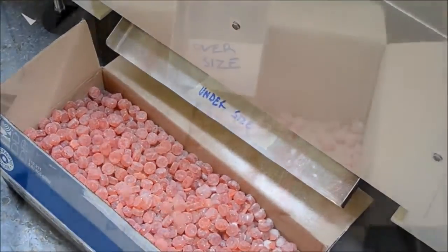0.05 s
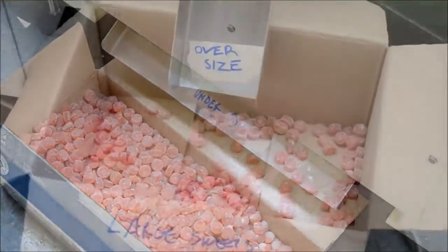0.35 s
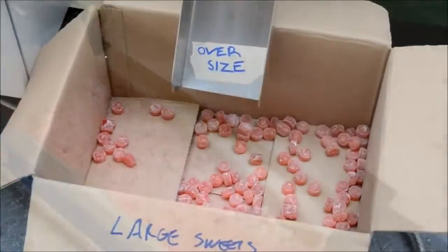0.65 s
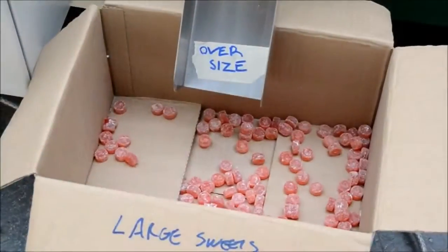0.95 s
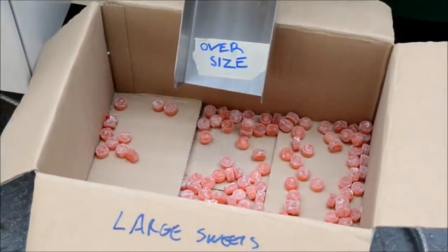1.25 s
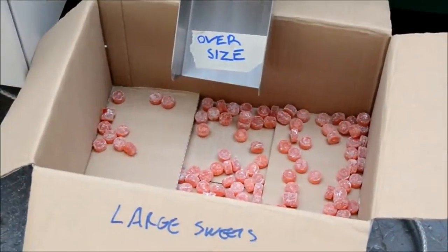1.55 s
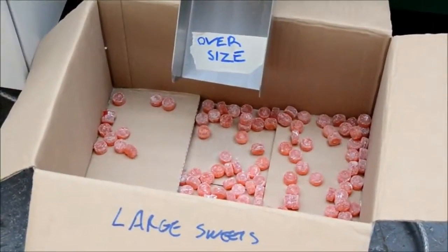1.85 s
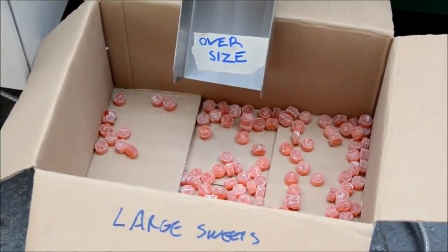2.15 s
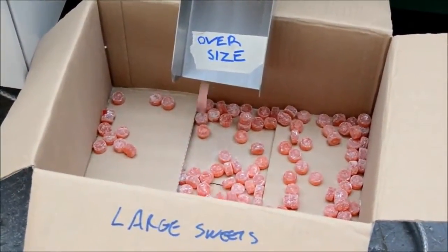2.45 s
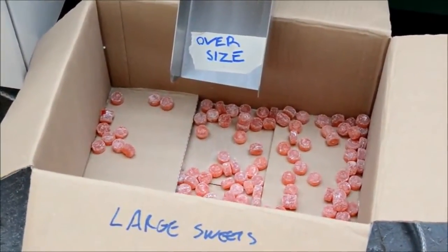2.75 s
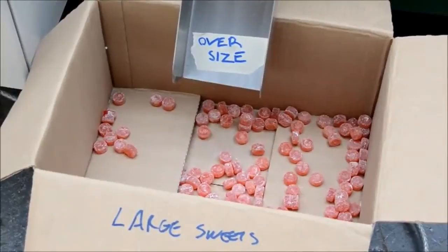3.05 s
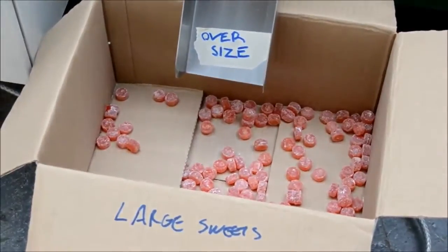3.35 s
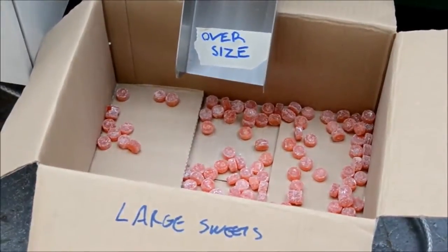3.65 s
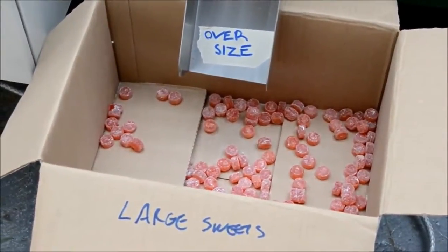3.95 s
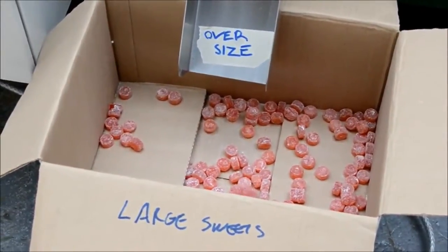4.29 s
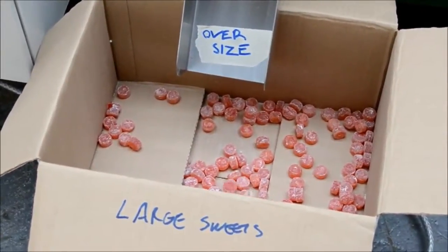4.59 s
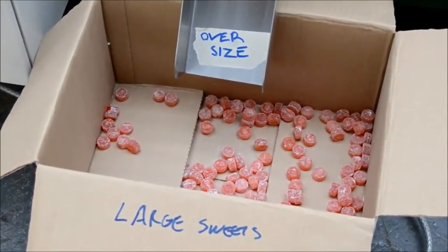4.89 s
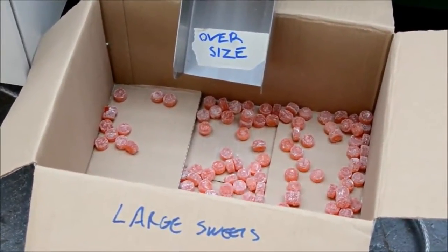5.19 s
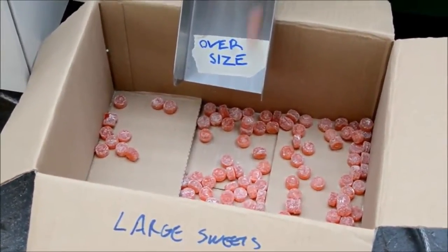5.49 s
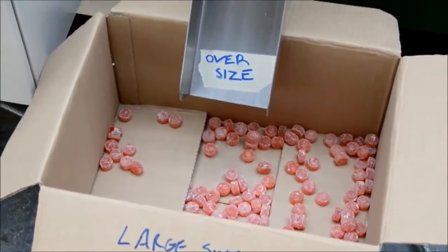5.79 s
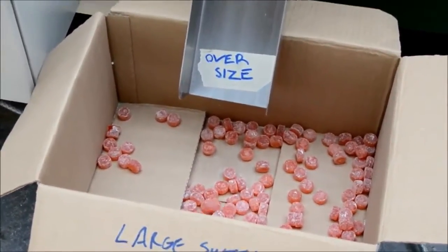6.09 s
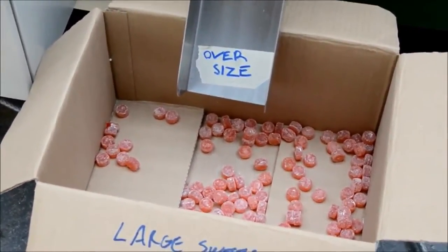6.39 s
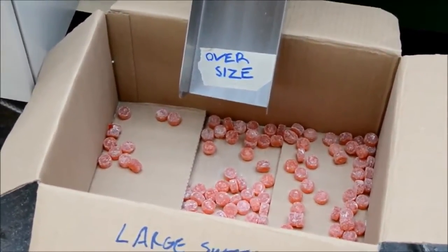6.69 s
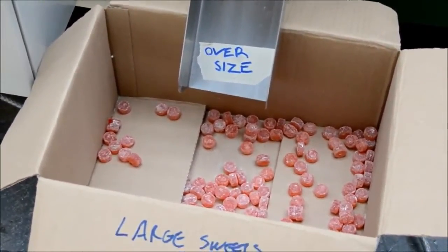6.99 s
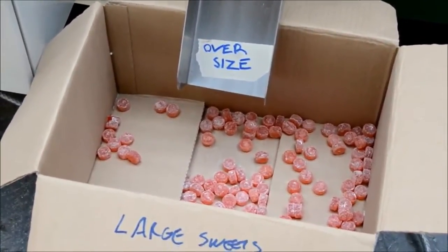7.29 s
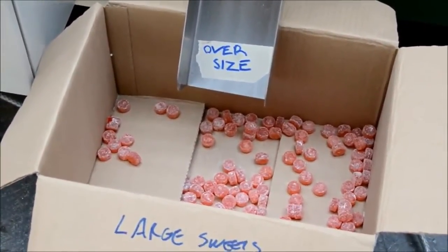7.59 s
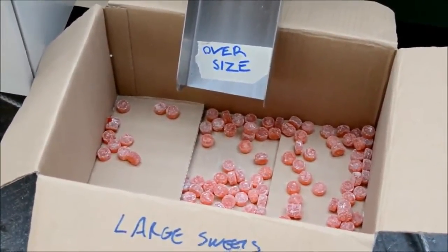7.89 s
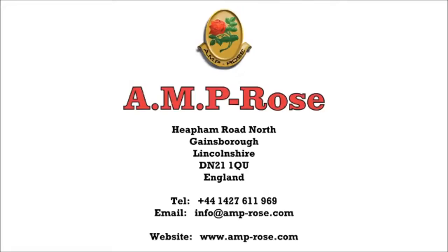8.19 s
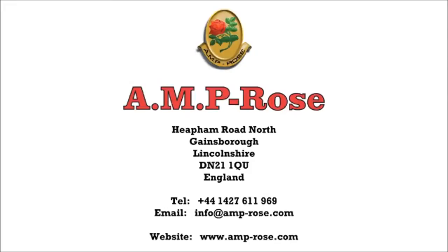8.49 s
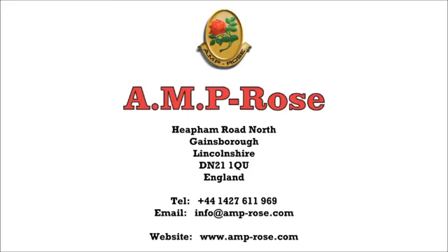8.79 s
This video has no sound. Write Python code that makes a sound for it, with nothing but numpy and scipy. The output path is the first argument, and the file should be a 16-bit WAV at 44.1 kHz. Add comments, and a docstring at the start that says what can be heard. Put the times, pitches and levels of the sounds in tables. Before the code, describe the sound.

Heard from beside a cardboard box in a factory, a sorting machine hums under a busy patter of hard sweets ticking, chinking and pinging on steel. Now and then one knocks dully into the box. As the batch runs out, the impacts grow sparse and a thin roller whine breaks into brief squeaks. The machine starts to rattle just before an abrupt stop.

```python
"""A sweet sorting machine in a factory, heard from beside a cardboard box under its chute.
From the start, hard sweets tumble over steel rollers and strike trays, exciting their ringing modes,
while the drive drones. Soon friction sets a roller singing, and a few sweets thud into the box.
As the batch ends the impacts thin out and the roller binds in short squeals.
Last, the frame begins to rattle, and the sound is cut short."""
import sys
import numpy as np
from scipy import signal
from scipy.fft import rfft, irfft
from scipy.io import wavfile
from scipy.ndimage import uniform_filter1d

SR = 44100
rng = np.random.default_rng(int(sys.argv[2]) if len(sys.argv) > 2 else 0)


def digitize_waveform(pressure):
    """Quantize a signal to 16-bit integers and store it at the path in sys.argv[1].

    Rows of a 2-D input are taken as channels; values are limited to [-1, 1].
    """
    field = np.atleast_2d(pressure).T
    bounded = np.clip(field, -1, 1)
    quanta = np.round(bounded * 32767).astype(np.int16)
    wavfile.write(sys.argv[1], SR, quanta)


N = 394254
STOP_S = 8.243

# Normal modes of the steel trays. Each row: frequency in Hz, relative level in dB.
TRAY_MODES = [(1528, -4), (1718, 2.5), (1905, -4), (2024, -3), (2110, -8), (2271, -2), (2400, -9),
              (2476, -3), (2573, -7), (2720, -9), (2788, -3), (2842, -5), (3050, -10), (3251, -5),
              (3348, -8), (3499, -6), (3983, -7), (4110, -6), (4349, -6), (4554, -6), (4715, -7),
              (5000, -8)]
# The load of sweets on the rollers. Each row: time in seconds, relative level of tumbling in dB.
SWEET_LOAD = [(0.0, -30), (0.27, -24.5), (0.73, -24.5), (0.91, -29), (1.07, -30.5), (1.27, -32.5),
              (1.42, -34), (1.65, -29.5), (1.8, -31), (1.98, -30), (2.1, -33.5), (2.4, -29.5),
              (2.64, -31.5), (2.99, -32), (3.23, -30.5), (3.45, -32.5), (3.88, -34), (4.02, -32.5),
              (4.15, -38.5), (4.92, -38.5), (5.17, -45.5), (5.41, -44.5), (5.7, -37.5), (6.17, -41),
              (6.91, -42.5), (7.4, -41.5), (8.0, -44.5)]


def tray_strikes(level_db=-5, crack_t60=.029, wash_t60=.39, ring_t60=.28, rise_s=.0062):
    """Impact excitation: a sweet cracks on steel and rebounds; dense modes wash out, a few ring on."""
    # Hard strikes. Each row: time in seconds, relative level in dB, relative treble in dB.
    hard_strikes = [(0.0064, -14.5, -13), (0.122, -20, -6), (0.1405, -18, -3.5), (0.156, -25.5, -8),
                    (0.1865, -20, 0.5), (0.2188, -22, -3.5), (0.2506, -20, -34), (0.3157, -22, -11.5),
                    (0.3331, -13.5, -14), (0.3678, -16.5, -11.5), (0.4604, -15.5, -15.5), (0.5185, -19, -3),
                    (0.5333, -18, -8), (0.548, -28, -10), (0.567, -25.5, -5), (0.5795, -19.5, -5.5),
                    (0.6297, -28.5, 3.5), (0.646, -27.5, -5), (0.6657, -21, -8.5), (0.7044, -17, -13.5),
                    (0.7688, -13.5, -12), (0.7962, -14, -17), (0.85, -19, -11), (0.951, -13.5, -17.5),
                    (1.1102, -13, -16.5), (1.122, -25, -8), (1.1528, -19, -23), (1.1851, -14.5, -14),
                    (1.209, -21, -19), (1.2512, -20, -12), (1.266, -20.5, -16.5), (1.4681, -19.5, -18),
                    (1.4887, -20, -18), (1.515, -14, -16), (1.537, -16.5, -15.5), (1.549, -20, -12),
                    (1.5674, -17, -12), (1.598, -21.5, -25), (1.694, -22, -32), (1.752, -22, -23),
                    (1.8338, -25.5, -10), (1.8766, -15, -21.5), (1.8967, -19, -12), (1.938, -14, -15.5),
                    (1.995, -17, -18), (2.1863, -17, -17.5), (2.2749, -15.5, -20), (2.3128, -16.5, -18),
                    (2.3278, -13.5, -16), (2.345, -19, -11), (2.3665, -15, -12.5), (2.467, -15.5, -12.5),
                    (2.519, -20, -16.5), (2.669, -19.5, -12), (2.6938, -16.5, -18.5), (2.7669, -12.5, -14),
                    (2.813, -17.5, -30.5), (2.8482, -14.5, -17), (2.936, -17, -12.5), (2.949, -14, -18.5),
                    (2.973, -22.5, -28), (3.052, -23, -33.5), (3.0905, -14.5, -14.5), (3.1335, -16.5, -12),
                    (3.145, -17.5, -17), (3.249, -26, -13), (3.366, -22, -14.5), (3.4048, -24, -20),
                    (3.487, -30, -18), (3.5002, -17, -14.5), (3.5562, -15.5, -18), (3.648, -22.5, -28),
                    (3.7747, -17, -10.5), (3.9178, -16.5, -24), (4.0856, -23.5, -18.5),
                    (4.2135, -27.5, -17), (4.3282, -20.5, -12), (4.3596, -20.5, -8.5), (4.384, -21, -19),
                    (4.576, -21.5, -5.5), (4.583, -17.5, -17.5), (4.598, -29, -12), (5.052, -31.5, -6.5),
                    (5.0836, -26.5, -19), (5.4658, -23, -18), (5.5946, -27.5, -13.5), (5.6482, -15.5, -8.5),
                    (5.7308, -20.5, -15.5), (7.198, -37, -6), (7.2085, -18.5, -6), (7.222, -24.5, -18),
                    (7.5527, -25.5, -17), (8.0718, -22, -15.5), (8.133, -27, -18), (8.1631, -19, -15),
                    (8.176, -20, -21), (8.216, -22, -18)]
    # Spectrum of a sweet meeting steel. Each row: frequency in Hz, gain in dB.
    contact_spectrum = [(100, -47), (500, -20.5), (1100, -0.5), (1800, -4.5), (2700, -3), (3500, -3),
                        (4800, -3), (6000, -1.5), (7800, -6), (8500, -1.5), (10000, -8.5), (11500, -30.5)]
    out, t = np.zeros(N), np.arange(SR // 4) / SR
    ring_t, clink_t = t[:SR // 7], t[:SR // 20]
    hz, mode_db = np.transpose(TRAY_MODES)
    patch_hz = np.geomspace(500, 12000, 110)
    decay = fade(ring_t, ring_t60 * (2000 / hz[:, None]) ** .5)
    # the last sweets of the batch land with little ring
    damped_db = .27 * np.minimum(curve(SWEET_LOAD) + 29.5, 0)
    # the blow takes a few milliseconds to spread through the sheet
    spread = np.sin(np.pi / 2 * np.minimum(t / rise_s, 1)) ** 2
    clink_shape = fade(clink_t, .05) * spread[:len(clink_t)]
    for s, db, bright_db in list(hard_strikes) + light_strikes():
        since_rebound = t - .015 * (.5 + rng.random())
        rebound = undb(-11) * fade(np.abs(since_rebound), crack_t60) * (since_rebound > 0)
        first_blow = fade(t, crack_t60) + undb(-17) * fade(t, wash_t60)
        contact = rng.standard_normal(len(t)) * np.hypot(first_blow, rebound)
        # an edge-on hit snaps more sharply, carries more treble and rings less
        snap_shape = fade(np.abs(t - rise_s / 2), .011) * undb(1 + .65 * bright_db)
        snap = rng.standard_normal(len(t)) * snap_shape
        contact = colour(contact * spread + snap, contact_spectrum)
        treble_db = bright_db + 9.5
        tilt_db = np.interp(patch_hz, [3800, 6500], [0, treble_db])
        ring_db = -8 + damped_db[int(s * SR)] - .2 * treble_db
        # each striking point favours its own patches of the dense modes
        patch_db = 3.8 * (np.clip(rng.standard_normal(len(patch_hz)), -2, 2) - .5)
        crack = colour(contact / strength(contact), np.column_stack([patch_hz, tilt_db + patch_db]))
        # the sweet adds a short clink of its own
        clink_hz = rng.uniform(2200, 5400, (9, 1))
        clink = np.sin(2 * np.pi * clink_hz * clink_t).sum(axis=0) * clink_shape
        detuned_hz = hz * (1 + .0025 * rng.standard_normal(len(hz)))
        weights = undb(mode_db * rng.random(len(hz))) * rng.uniform(-1, 1, len(hz))
        modes = np.sin(2 * np.pi * detuned_hz[:, None] * ring_t) * decay
        ringing = weights @ modes * spread[:len(ring_t)]
        start_s, gain = s - rise_s / 2, undb(db + level_db)
        add(out, start_s, gain * crack)
        add(out, start_s, gain * undb(-5) * clink / strength(clink))
        add(out, start_s, gain * undb(ring_db) * ringing / strength(ringing))
    return out


def light_strikes():
    """Random impacts, harder under a heavy load. Each row: time in seconds, level and treble in dB."""
    times, load_db = contact_times(count=20)
    level_scatter, treble_scatter = rng.standard_normal((len(times), 2)).T
    return list(zip(times, load_db - 2 + 1.5 * level_scatter, -14 + 3 * treble_scatter))


def tray_pings(spacing=.05, neighbour_db=-9, neighbour_t60=.099, rise_s=.0016):
    """Free vibration: a cleanly struck tray mode rings unsteadily while its neighbours clang briefly."""
    # Each row: start in seconds, frequency in Hz, level in dB, 60 dB decay time in seconds.
    struck_modes = [(.121, 2610, -24.5, .12), (.121, 3430, -30, .1), (.141, 6319, -21.5, .1),
                    (.141, 3420, -28.5, .12), (.187, 6000, -32, .1), (.219, 3190, -27.5, .14),
                    (.219, 8050, -35, .1), (.251, 4560, -21.5, .14), (.251, 3580, -29, .25),
                    (.333, 1680, -20.5, .14), (.518, 2760, -23.5, .14), (.518, 1915, -21.5, .14),
                    (.55, 1547, -27, .33), (.666, 7260, -25.5, .13), (.704, 1723, -30, 0.24),
                    (.769, 1770, -35.5, 0.21), (.952, 2764, -23.5, 0.22), (.953, 1890, -26.5, 0.25),
                    (1.087, 2450, -22, 0.14), (1.11, 1716, -31, .4), (1.484, 2320, -25, .2),
                    (1.488, 2740, -26, .2), (1.549, 1750, -37, .25), (1.561, 1098, -30, .6),
                    (1.69, 1098, -28, 0.55), (1.752, 2734, -23.5, 0.14), (1.834, 2300, -20, 0.1),
                    (1.834, 2600, -23, .1), (1.834, 3220, -22.5, 0.13), (1.834, 4170, -25, .12),
                    (1.834, 4900, -24, 0.1), (1.877, 1730, -26.5, 0.28), (1.877, 2670, -20.5, 0.1),
                    (1.974, 2770, -23.5, .17), (1.999, 3250, -35, 0.7), (2.187, 1640, -30.5, .2),
                    (2.361, 4420, -20.5, 0.14), (2.367, 1696, -25, .3), (2.467, 4800, -26, .11),
                    (2.767, 2810, -25.5, 0.237), (2.767, 6589, -33.5, .13), (2.769, 1720, -24, .35),
                    (2.813, 2500, -22, 0.15), (2.849, 1900, -27, .33), (2.849, 2860, -26, .14),
                    (2.949, 4130, -18.5, .05), (2.975, 2040, -24, 0.22), (3.09, 1710, -27, .25),
                    (3.09, 4128, -27.5, .1), (3.135, 1730, -26, 0.26), (3.135, 8500, -36, .1),
                    (3.409, 4400, -31, .12), (3.501, 8516, -35, .1), (3.557, 4000, -36, .13),
                    (3.648, 2467, -26, 0.19), (3.775, 1526, -29, .18), (3.92, 2510, -28.5, 0.3),
                    (3.92, 2840, -29, .16), (4.086, 3499, -34, .18), (5.649, 2830, -25, .12),
                    (6.21, 10340, -50, .15)]
    out, t = np.zeros(N), np.arange(SR // 2) / SR
    clang_t = t[:SR // 8]
    unsteady = 1 + .16 * (walk(110) + 1j * walk(110))  # in amplitude and phase
    for s, hz, db, t60 in struck_modes:
        note = np.imag(np.exp(2j * np.pi * hz * t) * unsteady[int(s * SR):][:len(t)]) * fade(t, t60)
        near_hz = hz * (1 + spacing * (np.array([-1.8, -1, 1, 2.5]) + rng.uniform(-.5, .5, size=4)))
        cycles = near_hz[:, None] * clang_t + rng.random(size=(4, 1))
        clang = np.sin(2 * np.pi * cycles).sum(axis=0) / 2
        add(note, 0, undb(neighbour_db) * clang * fade(clang_t, neighbour_t60))
        add(out, s, undb(db) * note * (1 - np.exp(-t / rise_s)))
    return out


def box_landings(clack_t60=.028, settle_t60=.37, knock_t60=.042, push_s=.00018, rise_s=.0056):
    """Damped plate vibration: a sweet clacks on cardboard, the panel knocks and the box floor thuds."""
    # Each row: time in seconds, level in dB, relative clack in dB, knock in Hz, relative knock in dB.
    landings = [(.401, -15.5, -2.5, 943, -9.5), (.432, -25.5, -8, 900, -11.5), (.448, -28, -6.5, 660, -10),
                (0.477, -24.5, -10, 694, -7.5), (.512, -32, -7, 656, -5), (.556, -35, -3, 780, -8),
                (.620, -24.5, -6.5, 1100, -8), (.754, -28, 7, 1305, 2.5), (.797, -30, 2, 700, -7),
                (2.414, -20, -2.5, 1310, -3), (2.554, -19, -1, 1196, -7), (2.628, -28.5, -5.5, 800, -11.5),
                (4.331, -22.5, -8, 1010, 1), (4.8109, -35, 15, 1120, 1.5), (5.654, -21, -4.5, 960, -7.5),
                (5.865, -32.5, 6, 1090, -9), (6.046, -15, -5, 1570, -11), (6.400, -33.5, 6.5, 1100, 4.5)]
    # Modes of the box floor. Each row: frequency in Hz, gain in dB, 60 dB decay time in seconds.
    floor_modes = [(278, -3.5, 0.047), (327, 16.5, 0.051), (358, 17, 0.037), (435, -6.5, 0.022),
                   (495, -2.5, 0.023)]
    # Modes of a cardboard panel. Each row: multiple of the knock's frequency, gain in dB.
    panel_modes = [(1, -0.5), (1.26, -5.5), (1.6, -9)]
    # Spectrum of a sweet meeting cardboard. Each row: frequency in Hz, gain in dB.
    clack_spectrum = [(100, -35), (260, 2), (500, 3.5), (1000, 2), (1900, 3), (2500, -6.5), (4000, -11),
                      (6000, -19.5), (11000, -37.5)]
    out, t = np.zeros(N), np.arange(SR // 4) / SR
    # the open box radiates almost no bass
    push = signal.sosfilt(signal.butter(6, 235, "high", fs=SR, output="sos"), np.exp(-t / push_s) * t)
    rise = 1 - np.exp(-t / rise_s)
    # after the clack, the sweets already lying there shift
    envelope = (fade(t, clack_t60) + undb(-27) * fade(t, settle_t60)) * rise
    for s, db, hard_db, panel_hz, knock_db in landings:
        thud = sum(undb(mode_db) * ring(push, hz * (1 + .03 * rng.standard_normal()), t60)
                   for hz, mode_db, t60 in floor_modes)
        clack = colour(rng.standard_normal(len(t)) * envelope, clack_spectrum)
        # a harder landing has a shorter contact, hence a brighter clack
        clack = colour(clack, [(300, .0033), (2500, .6 * max(hard_db, 0))])
        knock = sum(undb(mode_db) * np.sin(2 * np.pi * panel_hz * ratio * t) * fade(t, knock_t60 / ratio)
                    for ratio, mode_db in panel_modes)
        for part, part_db in ((thud, 1), (clack, hard_db - 1), (knock * rise, knock_db)):
            add(out, s, undb(db + part_db) * part / strength(part))
    return out


def sweet_chinks(low_hz=2400, high_hz=8000, db_per_octave=-6, t60=.06, rise_s=.00089):
    """Elastic collision: sweets touch with one short, glassy note, fainter the higher it is."""
    out, t = np.zeros(N), np.arange(SR // 6) / SR
    envelope = fade(t, t60) * (1 - np.exp(-t / rise_s))
    for s, load_db in zip(*contact_times(count=100)):
        hz = rng.uniform(low_hz, high_hz)
        db = load_db - 3 + db_per_octave * np.log2(hz / low_hz) + 3.5 * rng.standard_normal()
        add(out, s, undb(db) * np.sin(2 * np.pi * hz * t) * envelope)
    return out


def tumble(level_db=-4, ring_db=-5, ring_t60=.13, contact_t60=.12):
    """Incoherent summation: tiny contacts on the rollers add in energy and keep the trays ringing."""
    # Spectrum of the jostling sweets. Each row: frequency in Hz, gain in dB.
    jostle_spectrum = [(100, -33.5), (280, 0.5), (500, -10), (1000, 1.5), (1700, 10), (2600, 4), (3400, 0),
                       (4800, -3), (6000, -11), (7800, -15.5), (8500, -19.5), (10000, -22.5), (11500, -47)]
    t, load_db = np.arange(SR // 8) / SR, curve(SWEET_LOAD)
    energy = signal.fftconvolve(clicks(per_s=210, spread_db=.5) ** 2, fade(t, contact_t60) ** 2)[:N]
    grains = unit(colour(np.sqrt(np.abs(energy)) * rng.standard_normal(N), jostle_spectrum))
    dull = signal.sosfilt(signal.butter(1, 4000, fs=SR, output="sos"), grains)
    # a thin layer is quieter, and brighter because the sweets muffle each other less
    thin_db = .16 * (load_db.max() - load_db)
    grains = dull + undb(6 + .68 * thin_db) * (grains - dull)
    # each mode is caught now and then, so the ringing keeps changing pitch
    ringing = 0
    for hz, db in TRAY_MODES:
        taps = clicks(per_s=14, spread_db=-3)
        ringing += undb(db) * unit(ring(taps, hz, ring_t60 * (2000 / hz) ** .38))
    return undb(load_db + level_db - thin_db) * (grains + undb(ring_db) * unit(ringing))


def frame_rattle(start_s=8.066, swell_s=.13, start_db=-33.5, full_db=-24):
    """Forced vibration: a sudden, swelling clatter shakes the frame and sets its panels ringing."""
    # Response of the frame. Each row: frequency in Hz, gain in dB.
    frame_spectrum = [(30, -22), (100, -16), (260, 4.5), (480, 1), (680, 1.5), (1150, 5), (1700, -11.5),
                      (2800, -5), (5000, -21), (9000, -31), (11500, -58)]
    # Modes of its panels. Each row: frequency in Hz, relative level in dB, 60 dB decay time in seconds.
    panel_modes = [(278, -10, 0.042), (713, -5, .04), (933, 0, 0.077), (1180, 2.5, .04), (1329, -10, .1),
                   (2710, -5, 0.0494)]
    since = np.arange(N) / SR - start_s
    blows = unit(clicks(per_s=880, spread_db=2)) + 1.15 * rng.standard_normal(N)
    clatter = unit(colour(blows, frame_spectrum))
    ringing = sum(undb(db) * unit(np.gradient(ring(blows, hz, t60))) for hz, db, t60 in panel_modes)
    swell_db = np.interp(since, [0, swell_s], [start_db, full_db])
    return unit(clatter + undb(-2) * unit(ringing)) * undb(swell_db) * (since > 0)


def roller_song(lower_hz=1241, upper_hz=1275, level_db=-2.5, attack_s=.013, release_s=.15):
    """Friction-driven oscillation: two close roller resonances sing, swelling whenever it binds."""
    # Long rubs. Each row: start in seconds, length in seconds, relative level in dB.
    rubs = [(0.307, 0.59, -36.5), (2.3, 0.85, -36.5), (3.33, 0.66, -37), (5.535, 1.8, -39.5)]
    # Brief binding. Each row: middle in seconds, half length in seconds, relative level in dB.
    squeals = [(2.905, .04, -29.5), (5.579, .04, -31), (5.71, 0.072, -30.5), (5.79, .04, -34),
               (5.98, 0.1, -33), (6.107, .03, -34), (6.27, .04, -36), (6.33, 0.045, -34),
               (6.492, 0.02, -29.5), (6.573, 0.075, -34), (6.76, 0.033, -37), (6.875, .04, -32.5),
               (6.975, 0.028, -32.5), (7.062, 0.031, -35), (7.18, 0.038, -34), (7.41, .035, -35),
               (7.513, .03, -42)]
    t = np.arange(N) / SR
    rubbing, sag_db_per_s = undb(-44.5), 1  # even the free roller sings faintly
    for s, length, db in rubs:
        gate = np.clip(np.minimum((t - s) / attack_s, 1 + (s + length - t) / release_s), 0, 1)
        rubbing = np.maximum(rubbing, gate * undb(db - sag_db_per_s * (t - s)))
    for s, half_length, db in squeals:
        rubbing = np.maximum(rubbing, undb(db) * np.maximum(1 - ((t - s) / half_length) ** 2, 0))
    phase_per_hz = 2 * np.pi * np.cumsum(1 + .00393 * walk(40) + .008 * walk(400)) / SR
    lower = np.sin(lower_hz * phase_per_hz) * undb(1.6 * walk(45))
    upper = undb(-10) * walk(30) * np.sin(upper_hz * phase_per_hz)
    return unit(lower + upper) * rubbing * undb(level_db)


def drive(drone_db=-1, tones_db=-2.5, waver_db=2.5, jitter_hz=3):
    """Random modulation: motor and gears make a fluttering broadband drone with unsteady tones."""
    # Course of the drone. Each row: time in seconds, relative level in dB.
    drone_levels = [(0.0, -31), (0.69, -29), (1.0, -34), (1.25, -34), (1.72, -35.5), (2.58, -32),
                    (3.03, -35), (4.5, -32.5), (4.86, -36.5), (5.93, -34.5), (6.75, -37), (7.4, -36),
                    (8.0, -38)]
    # Spectrum of the drone as heard, with a faint hissy sheen near 9 kHz.
    # Each row: frequency in Hz, gain in dB.
    heard_spectrum = [(30, -42), (90, -24.5), (140, -18), (190, -14.5), (275, -2.5), (370, -5.5),
                      (430, -5.5), (520, -5), (630, -2), (760, -3.5), (960, -6.5), (1270, -2), (1420, -9),
                      (4000, -21.5), (7700, -40.5), (8900, -27), (11400, -52.5)]
    # Tones of the drive. Each row: frequency in Hz, relative level in dB.
    drive_tones = [(140, -63.5), (280, -54.5), (379, -45.5), (533, -56.5), (586, -50.5), (618, -46.5),
                   (686, -53.5), (888, -51.5)]
    noise = colour(rng.standard_normal(N), heard_spectrum)
    drone, tones = 0, 0
    # the octaves flutter separately, then all together
    for edge_hz in (180, 360, 720, 1440):
        band = signal.sosfiltfilt(signal.butter(4, edge_hz, fs=SR, output="sos"), noise)
        drone += band * undb(1.2 * walk(6))
        noise = noise - band
    drone = unit(drone + noise) * undb(curve(drone_levels) + drone_db + 1.77 * walk(25))
    for hz, db in drive_tones:
        phase = 2 * np.pi * np.cumsum(hz + jitter_hz * walk(22)) / SR
        tones += np.sqrt(2) * undb(db + tones_db + waver_db * walk(12)) * np.sin(phase)
    return drone + tones


def whirrs(t60=.04):
    """Resonance: narrow bands of noise swell briefly in the machine as hollow whirrs."""
    # Each row: middle in seconds, half width in seconds, frequency in Hz, level in dB.
    swells = [(.16, 0.053, 647, -34.5), (1.52, .03, 627, -40), (1.96, 0.077, 683, -35),
              (2.69, 0.036, 650, -34), (5.35, .25, 730, -40.5)]
    out, t = np.zeros(N), np.arange(N) / SR
    for s, half_width, hz, db in swells:
        hollow = unit(np.gradient(ring(rng.standard_normal(N), hz, t60)))
        out += undb(db) * hollow * np.exp(-((t - s) / half_width) ** 2)
    return out


def hall(x, wet_db, t60=.23, delay_s=.012):
    """Reverberation: the factory answers with a diffuse, duller tail."""
    t = np.arange(SR) / SR
    reflections = rng.standard_normal(SR) * fade(t, t60) * (t > delay_s)
    tail = colour(reflections, [(300, 3), (2500, 4), (10000, -10.5)])
    return x + undb(wet_db) * signal.fftconvolve(x, tail / np.sqrt(np.sum(tail ** 2)))[:N]


def contact_times(count):
    """Collision rate follows load: random times in seconds, and the load in dB at each."""
    load_db = curve(SWEET_LOAD)[:int(STOP_S * SR)]
    passed = np.cumsum(undb(load_db))
    at = np.searchsorted(passed, passed[-1] * (np.arange(count) + rng.random(count)) / count)
    return at / SR, load_db[at]


def clicks(per_s, spread_db):
    """Poisson process: independent contacts of random size and sign."""
    size = undb(spread_db * np.minimum(rng.exponential(size=N), 4))
    return (rng.random(N) < per_s / SR) * size * rng.choice([-1, 1], N)


def ring(x, hz, t60):
    """Damped harmonic oscillator driven by x."""
    radius, angle = np.exp(-np.log(1000) / (t60 * SR)), 2 * np.pi * hz / SR
    return signal.lfilter([0, radius * np.sin(angle)], [1, -2 * radius * np.cos(angle), radius ** 2], x)


def colour(x, points, size=4096):
    """Minimum-phase filter. Each row of points: frequency in Hz, gain in dB."""
    hz, db = np.transpose(points)
    bin_hz = np.maximum(np.arange(size // 2 + 1) * SR / size, 1)
    cepstrum = irfft(np.log(undb(np.interp(np.log(bin_hz), np.log(hz), db))))
    # folding the cepstrum makes the response causal
    cepstrum[1:size // 2] *= 2
    cepstrum[size // 2 + 1:] = 0
    return signal.fftconvolve(x, irfft(np.exp(rfft(cepstrum))))[:len(x)]


def walk(per_s):
    """Low-pass noise: a smooth random wander of rms 1."""
    hold = max(int(SR / per_s), 2)
    steps = np.repeat(rng.standard_normal(N // hold + 1), hold)
    return unit(uniform_filter1d(uniform_filter1d(steps, hold), hold)[:N])


def curve(rows):
    """Linear interpolation of a time table at every sample."""
    return np.interp(np.arange(N) / SR, *np.transpose(rows))


def fade(t, t60):
    """Exponential decay, by 60 dB in t60 seconds."""
    return np.exp(-np.log(1000) * t / t60)


def undb(db):
    """Decibels to amplitude ratio."""
    return 10 ** (np.asarray(db) / 20)


def unit(x):
    """Normalisation to rms 1."""
    return x / np.sqrt(np.mean(x ** 2))


def strength(x):
    """Rms of the loudest 4 milliseconds."""
    return np.sqrt(uniform_filter1d(x ** 2, size=176).max())


def add(out, s, x):
    """Superposition of x on out from s seconds."""
    start = max(int(s * SR), 0)
    out[start:start + len(x)] += x[:N - start]


def scene():
    """Superposition of sweets and machine; the box is close, so its direct sound dominates more."""
    impacts = hall(tray_strikes(), wet_db=-16) + hall(box_landings(), wet_db=-19.5)
    sweets = impacts + tray_pings() + sweet_chinks() + tumble()
    return (sweets + drive() + whirrs() + roller_song() + frame_rattle())[None]


def record(dry):
    """Gating and band limiting: the sound stops abruptly, and the top treble is cut steeply."""
    gate = np.clip((STOP_S - np.arange(N) / SR) / .001, 0, 1)
    return signal.sosfilt(signal.ellip(8, .2, 70, 11300, fs=SR, output="sos"), dry * gate)


dry = scene()
out = record(dry)
digitize_waveform(out)
```